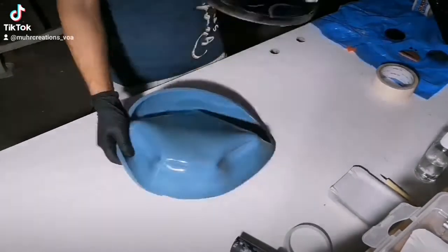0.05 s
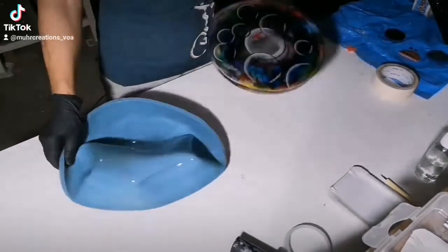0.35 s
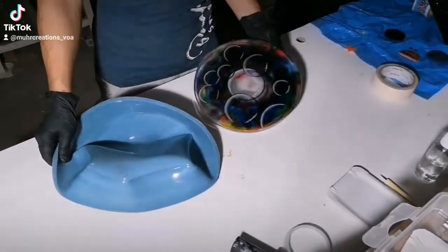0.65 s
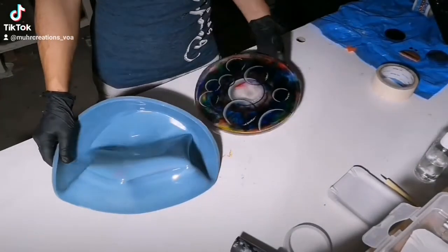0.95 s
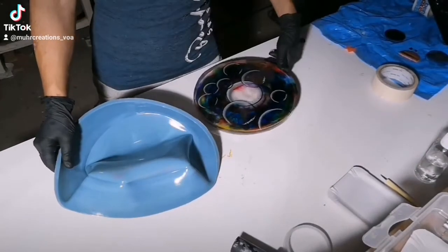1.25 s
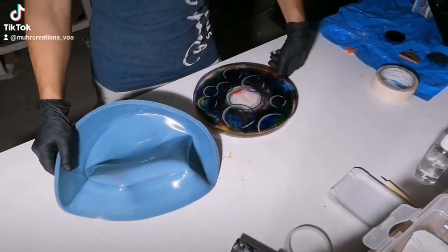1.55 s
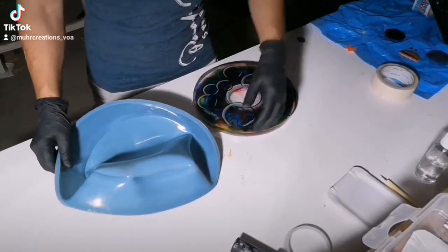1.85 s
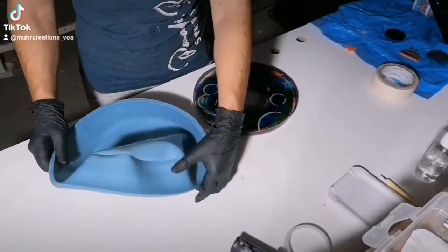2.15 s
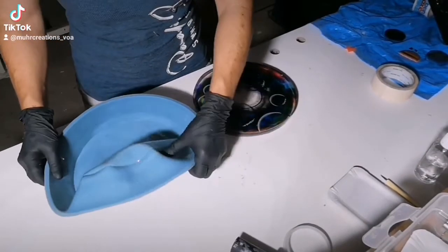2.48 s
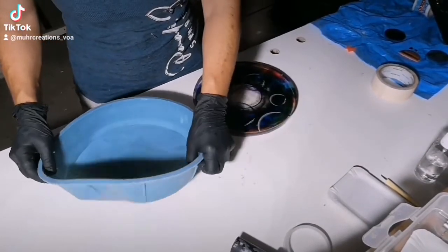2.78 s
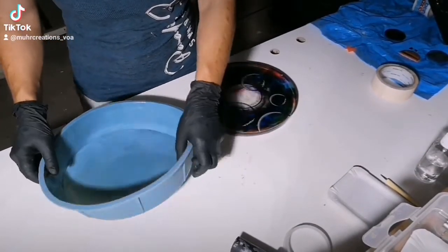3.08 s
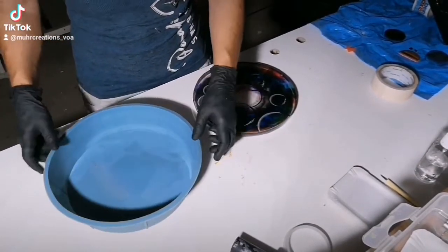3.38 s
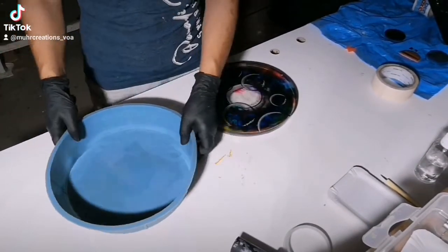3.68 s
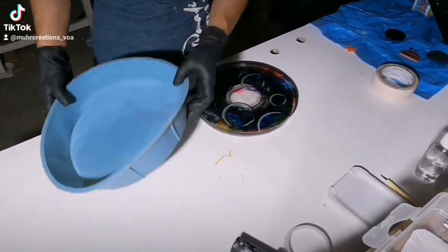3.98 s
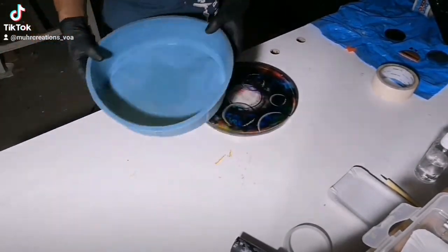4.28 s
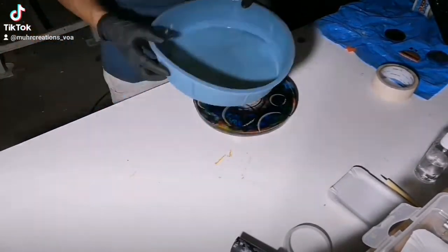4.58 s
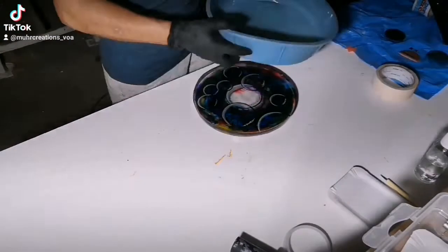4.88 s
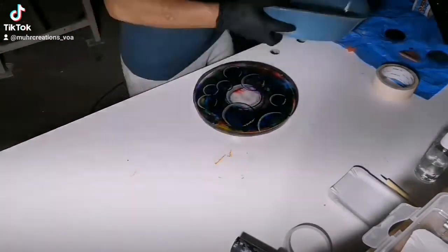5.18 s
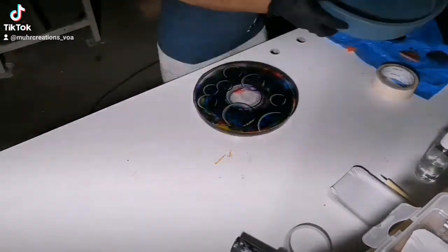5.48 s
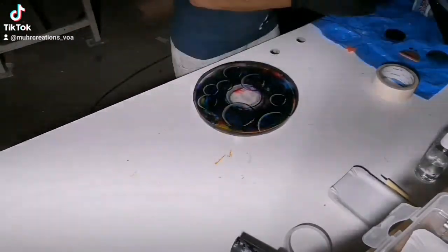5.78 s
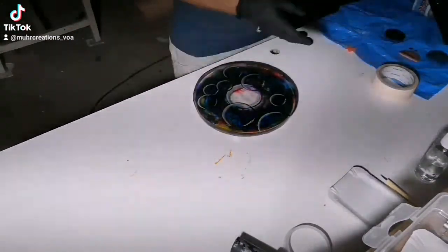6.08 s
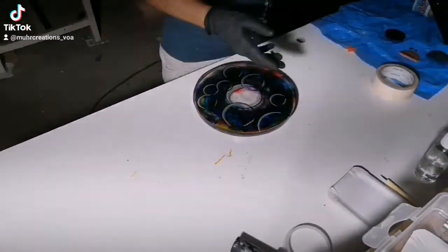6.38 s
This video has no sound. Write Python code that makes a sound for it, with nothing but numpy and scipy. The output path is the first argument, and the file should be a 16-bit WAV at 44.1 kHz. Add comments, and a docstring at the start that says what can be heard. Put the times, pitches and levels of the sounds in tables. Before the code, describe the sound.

Rubbery pops, a hard disc clattering and settling on a tabletop, then a floppy rubber mold slapping down amid faint rubbing.

```python
"""Resin disc and silicone mold on a worktable

A small workshop, a stereo pair of microphones close to the table. A folded silicone mold pops, is pulled
open by gloved hands and flops down. Right of centre a hard cast resin disc knocks on its rim, rocks and
drops flat, ringing the table top. The mold flops again, smacks the table and is lifted away.
Gloves stick and slip on rubber, rustling and squeaking faintly over quiet room noise."""
import sys
import numpy as np
from scipy import signal
from scipy.fft import rfft, irfft, next_fast_len
from scipy.io import wavfile

SR = 44100
rng = np.random.default_rng(int(sys.argv[2]) if len(sys.argv) > 2 else 0)


def digitize_waveform(pressure):
    """Quantize a signal to 16-bit integers and store it at the path in sys.argv[1].

    Rows of a 2-D input are taken as channels; values are limited to [-1, 1].
    """
    field = np.atleast_2d(pressure).T
    bounded = np.clip(field, -1, 1)
    quanta = np.round(bounded * 32767).astype(np.int16)
    wavfile.write(sys.argv[1], SR, quanta)


N = 284437

# folds of silicone popping open: (time [s], pitch [Hz], level [dB], t60 [s], snap level [dB])
POPS = [(.009, 1100, -25, 0.0048, -36.5), (0.0138, 960, -20, 0.014, -33), (0.0457, 980, -33.5, 0.011, -40),
        (3.05, 669, -29, 0.031, -69), (3.059, 774, -38, 0.017, -68)]
# modes of the air pocket behind a fold: (ratio to the pitch, level [dB])
POCKET_MODES = [(.58, -9.5), (.8, -1.5), (1, 3.5), (1.25, -13), (1.55, -19), (2.3, -20.5)]
# colour of a fold's snap: (frequency [Hz], level [dB])
SNAP = [(400, 0.5), (900, 5), (1900, 0.5), (3000, -0.5), (4200, -5.5), (6500, -10), (10000, -15.5),
        (14000, -27.5)]

# gloves on rubber; a tight grip drags, a light one hisses; the row at 1.19 s is the resin disc's rim scraping
# as it rolls: (middle [s], length [s], level [dB], grip [dB])
STROKES = [(0.03, 0.029, -77, -19.5), (0.473, 0.093, -72, 4.5), (0.591, 0.052, -66.5, 6.5),
           (1.19, 0.072, -74.5, 5.5), (1.279, 0.071, -69, 2), (2.298, 0.063, -68.5, 0),
           (2.445, 0.046, -63, 2.5), (2.486, 0.005, -74, -8), (2.579, 0.026, -70, 4),
           (2.62, 0.05, -66.5, 1.5), (2.722, 0.077, -71.5, 1.5), (2.83, 0.066, -75.5, 2),
           (3.137, 0.029, -72, -1), (3.388, 0.028, -61.5, 3), (3.941, 0.11, -75.5, -1),
           (4.171, 0.015, -73, -7.5), (5.428, .12, -79.5, -1.5), (5.68, 0.023, -76.5, 0.5)]
# arms and shirt brushing past: (middle [s], length [s], level [dB])
BRUSHES = [(2.42, 0.052, -66), (2.818, 0.034, -66), (3.238, 0.02, -66.5), (4.79, 0.064, -75),
           (5.073, 0.055, -72.5), (5.396, 0.18, -76), (5.894, 0.034, -60.5)]
# colours of the three parts of a stroke: (frequency [Hz], level [dB])
DRAG = [(250, -14.5), (500, -5.5), (720, 4), (1000, -12), (1500, -9), (3000, -36)]
RUSTLE = [(700, -14), (1300, 0.5), (1900, -1.5), (3200, 0), (5000, -12.5), (9000, -21), (15000, -53)]
HISS = [(3000, -22.5), (4800, -5), (6700, 1), (7700, 2), (8300, -3), (9400, 3), (11000, -3), (12500, -11),
        (15000, -15)]
# rubber catching on a glove: (middle [s], length [s], pitch [Hz], level [dB])
SQUEAKS = [(2.456, 0.014, 680, -61), (2.587, 0.01, 733, -62), (2.622, 0.014, 678, -53),
           (2.73, 0.073, 863, -64), (2.848, 0.056, 793, -69), (5.069, 0.011, 1870, -62.5),
           (5.44, 0.054, 1057, -70.5)]

# modes of the loaded table top: (frequency [Hz], level [dB], t60 [s])
TABLE_MODES = [(78.1, -10.5, 0.2), (103.3, -7.5, 0.16), (135, 3.5, 0.1406), (147.2, 2.5, 0.15),
               (172, -5.5, .07), (197.6, -3.5, 0.028), (226.8, 5.5, 0.09), (231.4, -3, 0.06),
               (254.1, -5, 0.27), (284, -3.5, .1), (301.6, -9.5, 0.17), (331.4, -23.5, 1.05),
               (377.4, -6, .06), (406.3, 0, 0.14), (447, -5.5, 0.0478), (492, -3, 0.082),
               (550.5, 1.5, 0.023), (561.6, 2.5, 0.045), (650, -1, 0.055), (780.5, -3, 0.075)]
# spread of a mode's phase at each microphone: (frequency [Hz], spread [rad])
MODE_PHASE_SPREAD = [(100, .14), (220, .24), (330, .45), (800, .4)]
# blows on the table; where one lands sets its boom near 100 Hz and its woody knock near 400 Hz:
# (time [s], force [dB], sharpness [dB], flatness [0 rim to 1 full face], boom [dB], knock [dB])
MOLD_FLOPS = [(0.155, -39, 7, 0.47, 0, -0.5), (0.191, -48.5, 13, 0.12, -2, 15),
              (.1935, -48.5, 5.5, 0.44, -7, -10), (.214, -55, 5.5, 1, -14, 3),
              (0.257, -40.5, -0.5, 0.25, 4, -15), (0.385, -69, 32, 0.82, -10, -13),
              (0.4165, -61.5, 12.5, 0, 14, -33), (.429, -65, 9.5, 0.054, 3.5, -19),
              (2.257, -42, -6.5, 0.73, -4.5, -8), (2.265, -30, -24, 0.25, -4.5, -1.5),
              (3.05, -59, -2, 0.0069, 17.5, 6), (3.302, -53, 16, 0.83, 5, 1),
              (3.394, -31.5, 7, 0.79, -1, 0), (3.402, -31.5, -17, 1, -14, 5.5),
              (3.5235, -47, 6, 0.45, -7, 6.5), (3.581, -42.5, -29, 0.87, 15, -1),
              (3.804, -66.5, 1, 0.37, -3, 6), (3.841, -56, -7, 0.4, 6, -3)]
DISC_KNOCKS = [(0.8915, -18.5, 12.5, 0.63, -3.5, -8.5), (.914, -26, -10.5, 0.19, 1.5, 1.5),
               (0.986, -24.5, 6, 0.68, -7.5, -2), (1.014, -27, 6.5, 0.22, -4, -2),
               (1.027, -30, 2.5, 0.5, -0.5, -0.5), (1.066, -28, -25, 0.82, -5, -6.5),
               (1.235, -55.5, 9, 0.2, -0.5, -2), (1.273, -36, -14.5, 0.68, -5, -4),
               (1.2955, -33.5, -3.5, 0.62, 12, 0), (1.306, -40.5, -11.5, 0.79, 9, -1),
               (1.3395, -27.5, 2, .2, -0.5, -0.5), (1.378, -42.5, -15, 0.5, -4.5, -9.5),
               (1.4405, -37.5, -15, 0.02, 3, 8), (1.458, -31, -1.5, 0.4, 1.5, -2.5),
               (1.467, -39.5, -21.5, 0.49, 15, -2), (1.481, -29.5, -6.5, 0, -2, 4.5),
               (1.494, -33.5, -25.5, 0.68, -7, -3), (1.508, -47, -4.5, 0.083, -5, -3.5),
               (1.575, -42.5, -0.5, 0.05, -7, -2.5), (1.609, -42.5, -4, 0.35, -4, 6),
               (1.643, -37.5, -3, 0.05, -4, -15.5), (1.695, -31, 1, 0.81, 2.5, -0.5),
               (1.7, -20, -6, 0.8, 6.5, -6), (1.7035, -22.5, -0.5, 0.94, 0.5, -2.5),
               (1.7085, -32.5, -9.5, 0.68, 2, -4), (1.713, -37, -9.5, .9, 1, -8),
               (1.7175, -28.5, -1.5, 0, 2, 2), (1.738, -32, 5.5, 0.68, 1.5, 0)]
# bright parts of a blow, a row each for clack, crack and tick:
# (level against the force [dB], share of the sharpness, gain when flat [dB])
RUBBER_PARTS = [(8.5, 1, -15.5), (-22, 0.87, 16), (-27.5, 0.62, 12)]
RESIN_PARTS = [(-0.5, 0.21, -4.5), (-25, 0.43, 2), (-32, 1.4, 1)]
# colours of rubber slap and smack, resin clack, edge crack, surface tick: (frequency [Hz], level [dB])
SLAP = [(250, -1), (450, 2), (700, 4.5), (1200, -1), (1900, -3.5), (2400, -13.5), (3000, -33), (5000, -87),
        (12000, -82.5)]
SMACK = [(700, -3), (1500, 10.5), (2500, 1), (4200, -3), (5500, -3.5), (8000, -8.5), (10500, -1.5),
         (12500, -20), (14500, -28)]
CLACK = [(300, -1.5), (550, 6.5), (800, 2.5), (1130, -2.5), (1320, -2), (1550, -3), (2200, -12),
         (3000, -18), (5000, -35), (12000, -65)]
CRACK = [(1500, -23), (2500, 2), (3200, -4.5), (4200, -9), (5500, -9.5), (8000, -22.5), (14000, -62)]
TICK = [(3500, -22.5), (5500, -6.5), (7200, 7), (10000, -2), (12500, -15), (15500, -36.5)]
# smooth rubber closing on the table and squeezing the air out: (time [s], level [dB])
SMACKS = [(0.3855, -57), (3.301, -52), (3.391, -40), (3.3971, -29)]
# the table swaying on its legs under the mold: (time [s], frequency [Hz], level [dB], t60 [s])
SWAYS = [(2.262, 39, -58, .9), (3.396, 40, -42, .9)]

# the point of contact travelling round the disc's rim: (time [s], left minus right [dB])
DISC_PAN = [(.9, -3.5), (1.05, -1.2), (1.5, -2), (1.7, -5.5)]
# weight on the rolling rim: (time [s], level [dB])
RIM_WEIGHT = [(1.1, -53.5), (1.18, -46.5), (1.239, -54.5), (1.29, -46), (1.39, -44), (1.425, -53),
              (1.495, -36), (1.53, -52.5), (1.59, -45), (1.66, -40.5), (1.7, -53.5)]
# force from the rim's unevenness: (frequency [Hz], level [dB])
RIM_BUMPS = [(70, -8), (135, 2), (220, -4.5), (300, -6.5), (410, -2), (600, -11), (1500, -32.5)]

# workshop reverberation by octave: (frequency [Hz], t60 [s], level against the direct sound [dB])
REVERB_BANDS = [(81.16, 0.67, -9.5), (151, 0.25, -8), (314, 0.35, -7), (631, 0.26, -5), (1250, 0.27, -7.5),
                (2742, 0.33, -8), (4866, 0.25, -6.5), (10900, 0.27, -9)]
# colour of the room noise: (frequency [Hz], level [dB])
ROOM_TONE = [(20, 11), (60, 1.5), (100, 2), (180, -4.5), (250, -7.5), (550, -11), (1000, -14.5),
             (2000, -18.5), (4500, -25.5), (7400, -28.5), (8200, -34), (9200, -30.5), (11500, -36),
             (15000, -39)]
# how alike the microphones hear close sounds, reverberation and room noise: (frequency [Hz], correlation)
NEAR_LIKENESS = [(100, 0.92), (300, 1), (700, 1), (1300, 0.054), (3500, 0.037), (7500, 0.91), (14000, 0.62)]
REVERB_LIKENESS = [(100, 0.82), (170, 0.78), (280, 0.74), (700, 0.74), (1300, 0.021), (3500, 0.25),
                   (7500, 0.56), (14000, 0.93)]
ROOM_TONE_LIKENESS = [(40, 0.79), (130, 0.051), (600, 0.0976), (3000, 0.044), (7000, 0.59), (14000, 0.86)]

TIME = np.arange(N) / SR
SIDES = np.array([[1], [-1]])  # left microphone, right microphone


def from_db(db):
    """Decibels to gain."""
    return 10 ** (np.asarray(db) / 20)


def at_hz(points, hz):
    """Read a table on a log-frequency axis."""
    points = np.array(points)
    return np.interp(np.log(np.maximum(hz, 1)), np.log(points[:, 0]), points[:, 1])


def add(track, s, sound):
    """Mix a sound into a track from time s on."""
    start = max(0, round(s * SR))
    part = sound[..., :N - start]
    track[..., start:start + part.shape[-1]] += part


def filtered(x, order, hz, kind):
    """A smooth high-pass or band-pass filter."""
    return signal.sosfilt(signal.butter(order, hz, kind, fs=SR, output="sos"), x + 1e-18)


def noise(colour, likeness):
    """Noise of a given colour and likeness at the two microphones; rms 1."""
    size = next_fast_len(N)
    hz = np.arange(size // 2 + 1) * SR / size
    alike = np.clip(at_hz(likeness, hz), -1, 1)
    mid, side = rfft(rng.standard_normal((2, size)))
    both = np.sqrt(1 + alike) * mid + np.sqrt(1 - alike) * side * SIDES
    x = irfft(both * from_db(at_hz(colour, hz)), size)[:, :N]
    return x / x.std()


def jitter(per_s):
    """A random line that turns per_s times a second."""
    return np.interp(TIME * per_s, np.arange(N), rng.standard_normal(N))


def dying(t, t60, rise):
    """Envelope of a ring: it builds during the contact, then decays."""
    return (1 - np.exp(-t / rise)) * np.exp(-np.log(1000) * t / t60)


def pan(db):
    """Gains at the two microphones for a left-minus-right level difference."""
    return from_db(SIDES * db / 2)


def bursts(times, levels_db, t60, rise, colour):
    """Short noise bursts of one colour: modes too close together to tell apart."""
    envelope, t = np.zeros(N), TIME[:SR // 4]
    for s, db in zip(times, levels_db):
        add(envelope, s, from_db(db) * dying(t, t60, rise))
    return envelope * noise(colour, NEAR_LIKENESS)


def jolts(times, levels_db, tops_hz, low_hz):
    """The first push of a contact on the air reaches the microphones as one clean pulse."""
    out, impulse = np.zeros(N), signal.unit_impulse(SR // 20)
    for s, db, top_hz in zip(times, levels_db, np.clip(tops_hz, 2 * low_hz, SR / 3)):
        pulse = filtered(impulse, 2, [low_hz, top_hz], "band")
        add(out, s, -from_db(db) * pulse / pulse.max())
    return out


def pops(glide=0.13, glide_s=0.0047, click_db=-5.5, click_hz=3500):
    """A fold lets go with a snap; right of centre, the air pocket behind it gives a short rising plop."""
    plops, t = np.zeros(N), TIME[:SR // 4]
    for s, hz, db, t60, _ in POPS:
        pitch = hz * (1 - glide * np.exp(-t / glide_s))
        phase = 2 * np.pi * np.cumsum(pitch) / SR
        tone = sum(from_db(mode_db) * np.sin(phase * ratio) for ratio, mode_db in POCKET_MODES)
        add(plops, s, from_db(db) * tone * dying(t, t60, rise=0.0018))
    times, *_, snaps_db = np.transpose(POPS)
    clicks = jolts(times, snaps_db + click_db, np.full(len(times), click_hz), low_hz=600)
    snaps = bursts(times, snaps_db, t60=0.025, rise=0.00075, colour=SNAP)
    return (plops + clicks) * pan(-3.1) + snaps


def rubbing(gain_db=-1.5, slip_spread_db=2.5, stroke_rustle_db=-1.5, brush_hiss_db=-9):
    """Rubber sticks and slips in tiny jerks under each stroke; cloth rustles as the arms move."""
    moves = [(s, length, [db + grip, db + stroke_rustle_db, db - grip])
             for s, length, db, grip in STROKES]
    moves += [(s, length, [-np.inf, db, db + brush_hiss_db]) for s, length, db in BRUSHES]
    swells = np.zeros((3, N))  # drag, rustle, hiss
    for s, length, levels_db in moves:
        near = np.abs(TIME - s) < 2 * length
        swell = from_db(levels_db)[:, None] * np.exp(-2 * ((TIME[near] - s) / length) ** 2)
        swells[:, near] = np.hypot(swells[:, near], swell)
    slips = from_db(slip_spread_db * jitter(per_s=300))
    slips /= np.sqrt(np.mean(slips ** 2))
    friction = sum(swell * noise(colour, NEAR_LIKENESS)
                   for swell, colour in zip(swells, (DRAG, RUSTLE, HISS)))
    return from_db(gain_db) * (friction * slips + hiss_crackle(swells[-1]))


def hiss_crackle(swell, peak_per_s=260, spread_db=4, gain_db=9):
    """Fine, high random crackle that thickens as the hiss swells."""
    onsets = rng.random(N) < peak_per_s / SR * np.sqrt(swell / swell.max())
    sizes = rng.choice([-1, 1], N) * from_db(spread_db * np.minimum(rng.exponential(1, N), 2))
    return from_db(gain_db) * swell * filtered(onsets * sizes, 2, [6000, 12500], "band")


def mold():
    """Near the centre, limp rubber slaps and smacks the table, nudges its modes and sets it swaying."""
    body, t = table_ring(MOLD_FLOPS, gain_db=-0.5, contact_s=0.003, knock_db=3, top_db=-4.5), TIME[:SR]
    for s, hz, db, t60 in SWAYS:
        add(body, s, from_db(db) * np.sin(2 * np.pi * hz * t) * dying(t, t60, rise=0.0053))
    body += shove(MOLD_FLOPS, gain_db=-2, top_hz=1400, low_hz=260)
    smacks = bursts(*np.transpose(SMACKS), t60=0.024, rise=0.00061, colour=SMACK)
    slaps = contacts(MOLD_FLOPS, SLAP, RUBBER_PARTS, clack_t60=0.038, tick_t60=0.028, rise=0.0003)
    return body * pan(-0.57) + smacks + slaps


def table_ring(blows, gain_db, contact_s, knock_db, top_db):
    """Every blow rings the same table modes; its force, flatness and place set their balance."""
    full_blow_db, scatter_db, pan_spread_db = -16.5, 1.5, 0.7
    load_detune, flat_damping = 0.026, 0.41  # shares of pitch and of ring time
    out, t = np.zeros((2, N)), TIME[:SR // 2]
    hz, mode_db, t60 = np.transpose(TABLE_MODES)
    polarity = -(-1) ** (np.arange(len(hz)) // 4)
    for s, db, sharp, flat, boom, knock in blows:
        strength, shift, lean, lag = rng.standard_normal((4, len(hz)))
        thud = db + 0.14 * (full_blow_db - db)  # light blows keep more of the lowest modes
        hollow = db + 14.5 * (flat - .5)  # a flat landing drives the middle modes harder
        clap = db + top_db + 9 * (flat - .5)  # and claps the upper ones
        balance = at_hz([(110, thud + boom), (128, thud), (160, thud), (200, hollow), (300, hollow),
                         (410, db + knock_db + knock), (550, clap)], hz)
        loaded_hz = hz * (1 + load_detune * shift)  # the load on the table shifts from blow to blow
        loaded_t60 = t60 * (1 - flat_damping * flat)
        rise = contact_s * from_db(-0.51 * sharp)  # a dull blow stays in contact longer
        rolloff = np.hypot(1, hz / (3000 * from_db(sharp)))  # and cannot reach the upper modes
        rings = np.exp(2j * np.pi * loaded_hz[:, None] * t) * dying(t, loaded_t60[:, None], rise)
        gains = polarity * from_db(gain_db + mode_db + balance + scatter_db * strength) / rolloff
        mic_gains = from_db(pan_spread_db * lean * SIDES)
        mic_phases = np.exp(1j * at_hz(MODE_PHASE_SPREAD, hz) * lag * SIDES)
        add(out, s, ((gains * mic_gains * mic_phases) @ rings).imag)
    return filtered(out, 4, 62, "high")  # the ring carries next to nothing below about 62 Hz


def shove(blows, gain_db, top_hz, low_hz, sharp_share=0.29):
    """Sharp blows shove the air with a stronger, narrower pulse than dull ones."""
    times, db, sharp, *_ = np.transpose(blows)
    edge_db = sharp_share * sharp
    return jolts(times, db + gain_db + edge_db, top_hz * from_db(edge_db), low_hz)


def contacts(blows, colour, parts, clack_t60, tick_t60, rise):
    """A dry clack, an edge crack and a surface tick on each blow, growing with force and sharpness."""
    times, db, sharp, flat, *_ = np.transpose(blows)
    clack_db, crack_db, tick_db = (db + part_db + share * sharp + flat_db * flat
                                   for part_db, share, flat_db in parts)
    clacks = bursts(times, clack_db, clack_t60, rise, colour)
    cracks = bursts(times, crack_db, tick_t60, rise, CRACK)
    ticks = bursts(times, tick_db, tick_t60, 2 * rise, TICK)
    return clacks + cracks + table_reflection(ticks) * pan(-1.6)


def table_reflection(x, lag_s=0.0019, share=0.37):
    """The hard table top mirrors a sound into the microphones a moment later and combs its treble."""
    return x + share * np.array([np.interp(TIME - lag_s, TIME, channel, left=0) for channel in x])


def disc():
    """Right of centre, hard resin on the table: sharp knocks, a rocking chatter, the final drop."""
    body = table_ring(DISC_KNOCKS, gain_db=0, contact_s=0.0022, knock_db=2.5, top_db=0) + rolling()
    body += shove(DISC_KNOCKS, gain_db=-2.5, top_hz=1060, low_hz=229)
    place = pan(np.interp(TIME, *np.transpose(DISC_PAN)))
    clacks = contacts(DISC_KNOCKS, CLACK, RESIN_PARTS, clack_t60=0.045, tick_t60=0.054, rise=0.00063)
    return body * place + clacks


def rolling(t60_share=0.48):
    """Between knocks the uneven rim rolls on the table and keeps its modes rumbling."""
    t = TIME[:SR // 4]
    panel = sum(from_db(db) * np.sin(2 * np.pi * hz * t) * dying(t, t60_share * t60, rise=0.001)
                for hz, db, t60 in TABLE_MODES)
    rumble = signal.fftconvolve(noise(RIM_BUMPS, NEAR_LIKENESS), panel[None], axes=1)[:, :N]
    weight_db = np.interp(TIME, *np.transpose(RIM_WEIGHT), left=-np.inf, right=-np.inf)
    return from_db(weight_db) * rumble / rumble.std()


def squeaks(wobble=0.331):
    """Stick and slip fall into a loose rhythm for an instant: a faint, hoarse chirp."""
    out, waver = np.zeros(N), 1 + wobble * jitter(per_s=600)
    for s, length, hz, db in SQUEAKS:
        phase = 2 * np.pi * np.cumsum(hz * waver) / SR
        out += from_db(db) * np.exp(-2 * ((TIME - s) / length) ** 2) * np.sin(phase)
    return out


def workshop_reverb(x, first_echo_s=0.0016, build_s=0.00057):
    """Diffuse reflections reach the microphones after a short gap and die away octave by octave."""
    t, response = TIME[:int(.8 * SR)], 0
    diffuse = noise([(20, 0), (20000, 0)], REVERB_LIKENESS)
    for band, (hz, t60, db) in enumerate(REVERB_BANDS):
        fade = dying(np.maximum(t - first_echo_s, 0), t60, build_s)
        start = band * SR // 2  # each octave takes its own stretch of noise
        tail = diffuse[:, start:start + len(t)] * fade / np.linalg.norm(fade)
        response += from_db(db) * filtered(tail, 2, [hz / np.sqrt(2), hz * np.sqrt(2)], "band")
    return signal.fftconvolve(x, response, axes=1)[:, :N]


def scene():
    """Disc, mold and hands close to the microphones, the workshop and its steady noise behind."""
    direct = disc() + mold() + pops() + rubbing() + squeaks()
    return direct + workshop_reverb(direct) + from_db(-63.5) * noise(ROOM_TONE, ROOM_TONE_LIKENESS)


def record(dry, low_cut_hz=18, top_hz=15100):
    """The recorder thins the deepest bass and cuts the top."""
    thinned = filtered(dry, 1, low_cut_hz, "high")
    return signal.sosfilt(signal.ellip(10, .1, 80, top_hz, fs=SR, output="sos"), thinned)


dry = scene()
out = record(dry)
digitize_waveform(out)
```